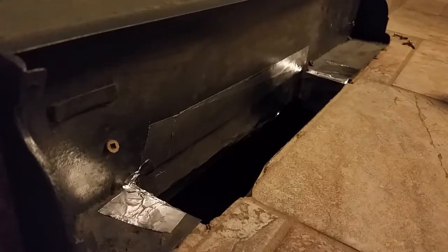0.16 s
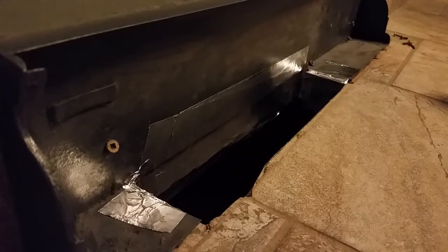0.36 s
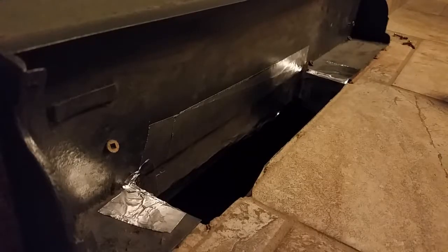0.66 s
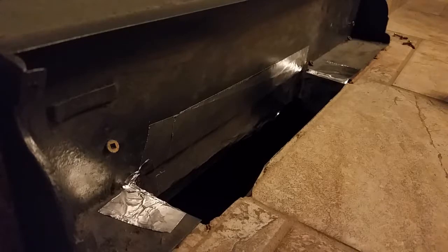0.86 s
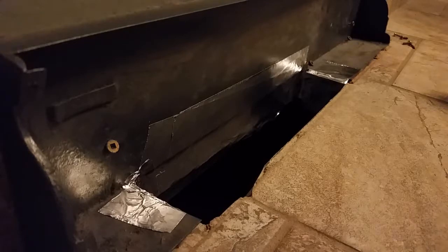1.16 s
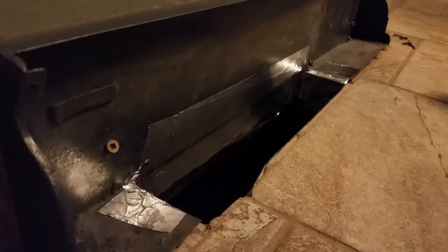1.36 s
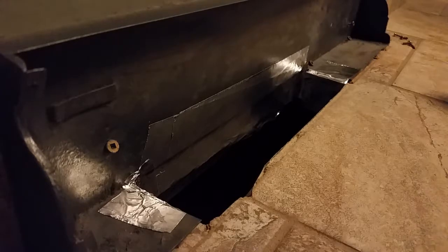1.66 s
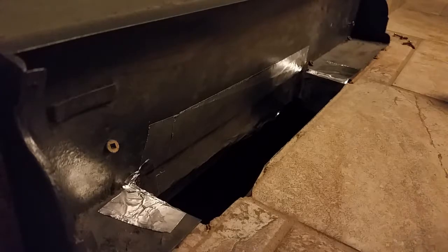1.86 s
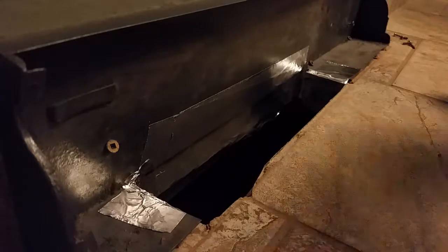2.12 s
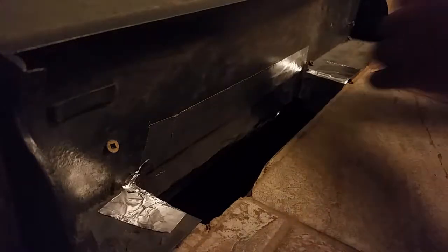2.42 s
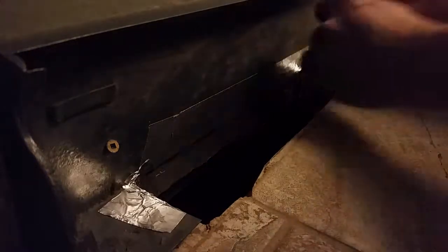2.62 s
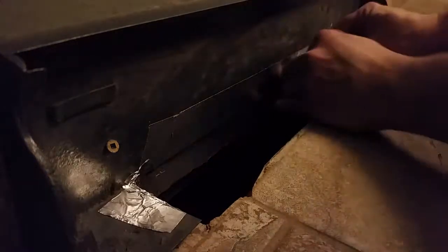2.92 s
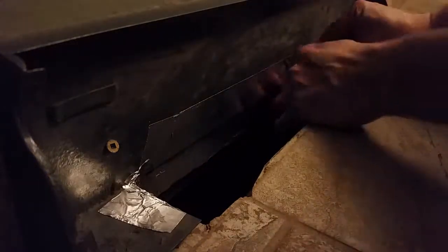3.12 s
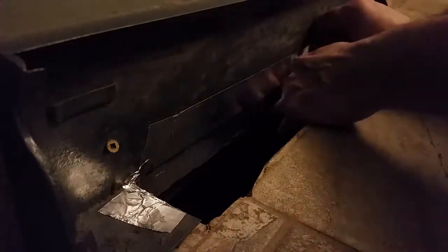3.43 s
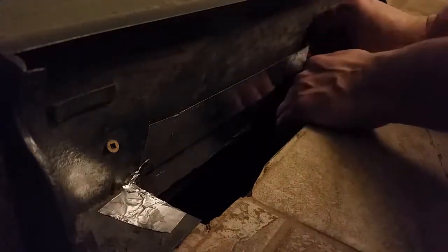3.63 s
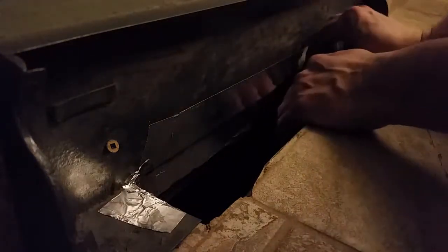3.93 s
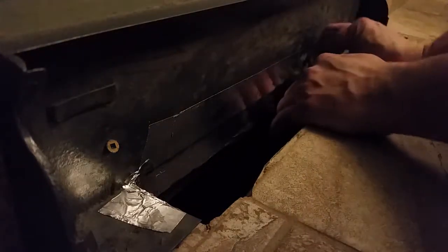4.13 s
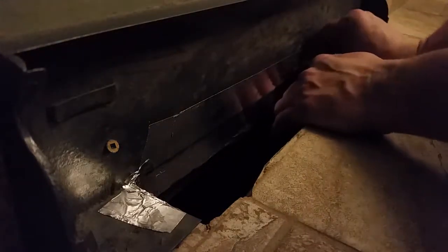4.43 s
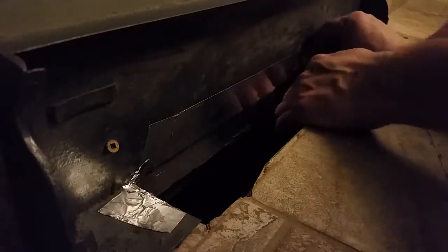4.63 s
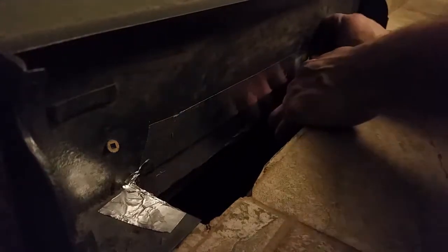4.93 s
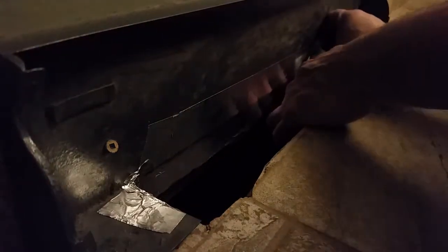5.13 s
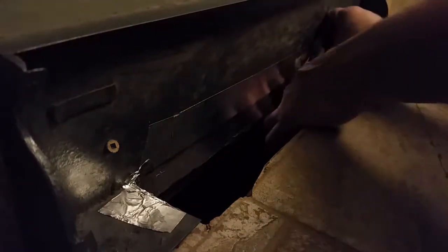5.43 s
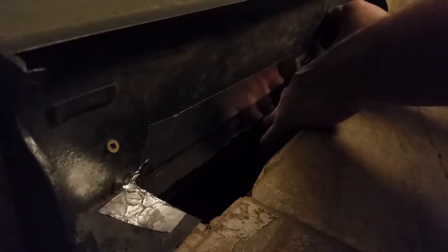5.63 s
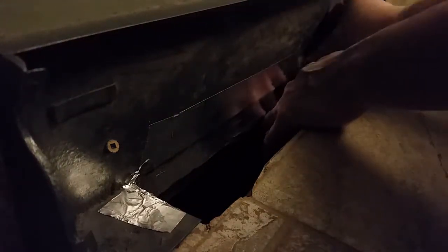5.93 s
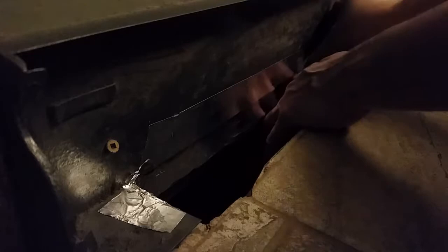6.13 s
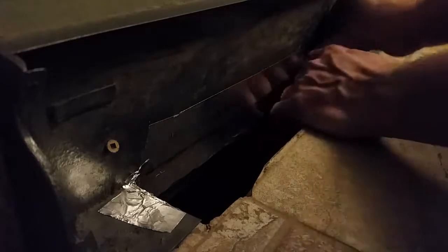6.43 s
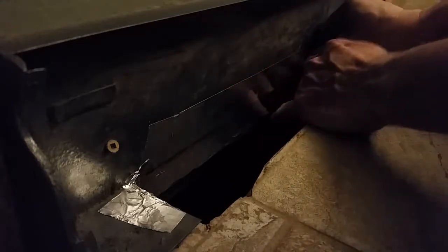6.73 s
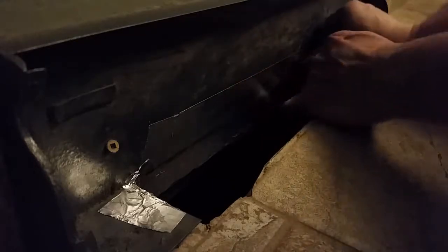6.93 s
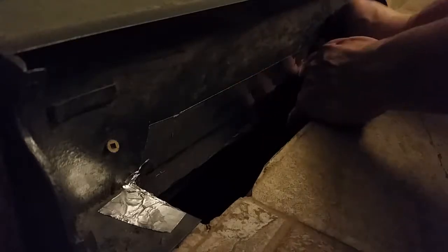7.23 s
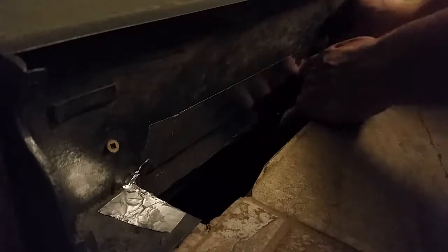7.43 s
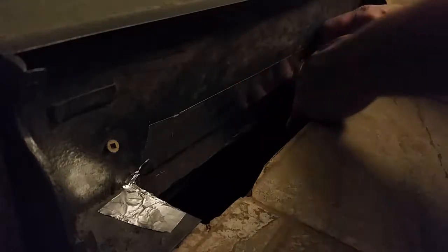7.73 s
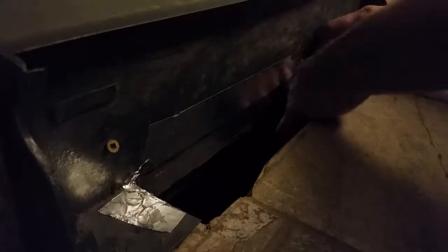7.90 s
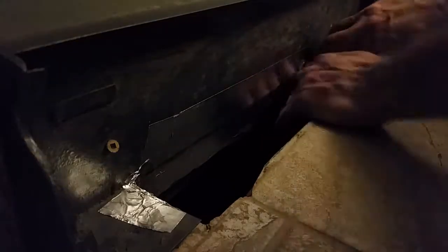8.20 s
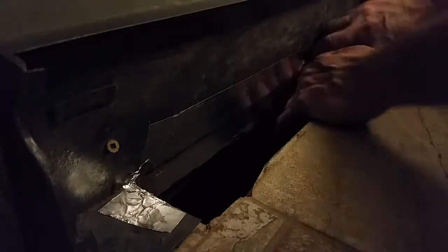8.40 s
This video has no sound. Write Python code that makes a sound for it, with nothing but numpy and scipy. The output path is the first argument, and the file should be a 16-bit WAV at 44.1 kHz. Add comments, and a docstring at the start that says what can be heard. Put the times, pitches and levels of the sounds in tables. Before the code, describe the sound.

Fingers rub crackling foil tape down in uneven strokes, with light knocks and rasps from a thin panel in a quiet room.

```python
"""Aluminium foil tape hisses, crinkles and snaps close up, as hands press it onto a thin panel.
Sliding fingers make the hiss, wrinkles give way in dry ticks, and buckling creases crack.
Behind the foil the panel rasps and scrapes with friction, knocks when bumped, rumbles and flexes.
It lies beside an opening in the tiled floor of a small room filled with a faint low hum."""
import sys
import numpy as np
from scipy import signal
from scipy.fft import rfft, irfft
from scipy.io import wavfile

SR = 44100
rng = np.random.default_rng(int(sys.argv[2]) if len(sys.argv) > 2 else 0)


def to_wav(sig):
    """Store sig (one row per channel, or 1-D mono) as 16-bit WAV at the path in sys.argv[1].

    Samples outside -1..1 are clipped; the rate is SR.
    """
    pcm = np.clip(np.atleast_2d(sig), -1, 1) * 32767
    pcm = np.round(pcm).astype(np.int16)
    wavfile.write(sys.argv[1], SR, pcm.T)  # frames by channels


N = 377496
TIME = np.arange(N) / SR


def from_db(db):
    """Decibels to gain."""
    return 10 ** (np.asarray(db) / 20)


def together(*levels_db):
    """Level in dB of several layers whose powers add."""
    return 10 * np.log10(sum(from_db(db) ** 2 for db in levels_db))


def unit_energy(x):
    """Scale each channel so that its squares sum to one."""
    return x / np.sqrt(np.sum(x ** 2, axis=-1, keepdims=True) + 1e-20)


def automation(rows):
    """Join timed breakpoints by straight lines, one curve per value column."""
    times, *columns = np.transpose(rows)
    return [np.interp(TIME, times, column) for column in columns]


def drift(per_s):
    """Random modulation with a spread near one."""
    return np.interp(TIME * per_s, np.arange(N // 8), rng.standard_normal(N // 8))


def add(track, s, sound):
    """Mix a sound into a track at s seconds."""
    start = int(np.clip(s * SR, 0, N - 1))
    track[..., start:start + sound.shape[-1]] += sound[..., :N - start]


def convolve(x, response):
    """Pass a sound through an impulse response."""
    return signal.oaconvolve(np.atleast_2d(x), np.atleast_2d(response), axes=-1)[:, :N]


def response_of(eq, size=4096):
    """Minimum-phase impulse response of an EQ curve."""
    hz, level_db = np.transpose(eq)
    bins_hz = np.maximum(np.arange(size // 2 + 1) * SR / size, 1)
    gains = from_db(np.interp(np.log(bins_hz), np.log(hz), level_db))
    cepstrum = irfft(np.log(gains))
    fold = 1 + np.sign(size // 2 - np.arange(size))
    fold[0] = 1
    return irfft(np.exp(rfft(cepstrum * fold)))


def coloured(x, eq):
    """Apply an EQ curve, scaled so that white noise keeps its power."""
    return convolve(x, unit_energy(response_of(eq)))


def band(x, kind, hz, order):
    """Low-pass or high-pass filter."""
    return signal.sosfilt(signal.butter(order, hz, kind, fs=SR, output="sos"), x)


def resonate(x, hz, width_hz):
    """Two-pole resonance with gain one at its peak."""
    r = np.exp(-np.pi * width_hz / SR)
    poles = [1, -2 * r * np.cos(2 * np.pi * hz / SR), r * r]
    return signal.lfilter(np.array([1, 0, -1]) * (1 - r * r) / 2, poles, x + 1e-18)


def stereo_noise(length, likeness):
    """White noise, from wide (likeness 0) to mono (1): uneven radiation reaches each side differently."""
    centre = np.sqrt(likeness) * rng.standard_normal(length)
    return centre + np.sqrt(1 - likeness) * rng.standard_normal((2, length))


def burst(decay_s, spread_db, likeness):
    """A quickly dying run of uneven micro-slips, of unit energy."""
    t = TIME[:SR // 8]
    sizes = from_db(spread_db * rng.standard_normal(len(t)))
    return unit_energy(stereo_noise(len(t), likeness) * sizes * np.exp(-t / decay_s))


def grains(per_s, spread_db, likeness):
    """Random slips with power one; spread_db makes a few stand out."""
    sizes = from_db(spread_db * np.minimum(rng.exponential(1, N), 4))
    slipping = rng.random(N) < per_s / SR
    return unit_energy(sizes * slipping * stereo_noise(N, likeness)) * np.sqrt(N)


def shifting(x):
    """The sliding hand frees and damps resonances, so the colour keeps changing; power one."""
    rings = sum((-1) ** k * resonate(x, hz, 0.2 * hz) * from_db(4 * drift(per_s=35))
                for k, hz in enumerate(np.geomspace(250, 15000, 20)))
    return unit_energy(rings) * np.sqrt(N)


# EQ of the still room: f/Hz, relative level/dB
ROOM_AIR_EQ = [(60, 12), (110, -5.5), (250, -14), (1000, -70), (4000, -12.5), (6000, -69)]


def room_tone(hum_hz=99.6):
    """A bed of low air noise and a hum that wavers a little in level."""
    air = coloured(stereo_noise(N, likeness=0.84), ROOM_AIR_EQ)
    hum = np.sqrt(2) * np.sin(2 * np.pi * hum_hz * TIME)
    return from_db(-68.5) * air + from_db(-64 + 2 * drift(per_s=14)) * hum


def in_room(x, wet_db, t60_s=0.39):
    """Direct sound plus a short room tail whose treble dies first."""
    t = TIME[:SR // 2]
    wash = rng.standard_normal((2, len(t)))
    wash += band(wash[0] - wash, "low", 500, order=1)   # long waves reach both sides alike
    dull = band(wash, "low", 6000, order=1)
    bright = (wash - dull) * np.exp(-t / 0.014)
    tail = unit_energy((dull + bright) * from_db(-60 * t / t60_s))
    return convolve(x, unit_energy((t == 0) + from_db(wet_db) * tail))


# Rumble from the weight of the resting hands: t/s, level/dB
LEANING = [(0, -70.5), (1.3, -63.5), (3.05, -50.5), (3.85, -62.5), (4.25, -57.5), (7.8, -60.5), (8.2, -50)]
# EQ of the panel's low end: f/Hz, relative level/dB
RUMBLE_EQ = [(35, -37), (70, -0.5), (100, 2.5), (170, -0.5), (260, -4), (450, -9.5), (1500, -37.5)]


def panel_rumble(rasp_db):
    """The whole sheet rumbles under the hands, and each stroke rocks it too."""
    rumble_db = together(*automation(LEANING), rasp_db - 7)
    envelope = from_db(rumble_db + 3.2 * drift(per_s=38))
    return coloured(envelope * grains(per_s=700, spread_db=0, likeness=0.8), RUMBLE_EQ)


OVERTONE = 1.63   # second resonance of a flexing or scraped panel, as a multiple of the first
# Judders of the panel: t/s, rise/s, f/Hz, level/dB
FLEXES = [(1.308, 0.015, 93.4, -38.5), (6.859, 0.0043, 370, -37.5)]


def panel_flexing():
    """The panel flexes under a finger: a short swell at a wavering pitch, with a weaker overtone."""
    out = np.zeros(N)
    for s, rise_s, hz, level_db in FLEXES:
        age = TIME[:SR // 3] / rise_s
        swell = (age * np.exp(1 - age)) ** 2
        wavering_hz = hz * (1 + 0.02 * drift(per_s=430)[:len(swell)])
        phase = 2 * np.pi * np.cumsum(wavering_hz) / SR
        tone = np.sin(phase) + 0.22 * np.sin(OVERTONE * phase)
        add(out, s, from_db(level_db) * np.sqrt(2) * swell * tone)
    return out


# EQ of the rubbed panel: f/Hz, relative level/dB
RASP_EQ = [(130, -11.5), (380, 0.5), (950, 0), (1450, 5), (2500, -3), (9000, -13.5)]


def panel_rasp(rasp_db):
    """Friction shakes the panel unevenly: a grainy midrange under the foil."""
    envelope = from_db(rasp_db + 2.52 * drift(per_s=81))
    friction = shifting(grains(per_s=2500, spread_db=2, likeness=0.4))
    return coloured(envelope * friction, RASP_EQ)


# Hollow fingertip drags: peak t/s, half length/s, f/Hz, level/dB
SCRAPES = [(1.3, 0.07, 350, -57), (1.566, 0.038, 330, -54), (2.364, 0.082, 1350, -51),
           (4.856, 0.019, 780, -36.5), (5.9, 0.5, 1550, -67), (6.529, 0.031, 696, -40.5),
           (7.42, 0.013, 1620, -39)]


def panel_scrapes(overtone_db=-11):
    """Stick-slip noise swells and fades in one narrow resonance and its overtone."""
    out = np.zeros((2, N))
    slips = stereo_noise(N, likeness=0.87)
    for s, half_length_s, hz, level_db in SCRAPES:
        width_hz = 0.18 * hz
        ringing = resonate(slips, hz, width_hz)
        ringing += from_db(overtone_db) * resonate(slips, OVERTONE * hz, width_hz)
        swell = np.exp(-((TIME - s) / half_length_s) ** 2 / 2)
        out += from_db(level_db) * swell * ringing / ringing.std()
    return out


# Bending modes of the panel: f/Hz
PANEL_MODES_HZ = [99, 130, 166, 194, 260, 430, 497, 653]
# Hands bumping the panel: t/s, relative thud level/dB, relative clack level/dB, clack f/Hz
KNOCKS = [(1.485, -50, -55, 404), (1.529, -47, -40, 2920), (1.83, -47, -56, 500), (1.911, -63, -45, 490),
          (2.86, -30, -34, 600), (2.989, -69, -38, 2280), (3.034, -41, -40, 1590), (3.154, -39, -32, 1760),
          (3.407, -43.5, -42.5, 587), (4.228, -41, -44, 1670), (4.455, -55, -42.5, 2500),
          (4.771, -93, -51, 1000), (4.805, -63, -39.5, 800), (5.07, -70, -33.5, 1440),
          (5.111, -42, -30.5, 2150), (6.505, -70, -36.5, 980), (7.84, -33, -38, 1340),
          (8.406, -61, -41, 1260)]


def panel_thuds():
    """The body of each knock: the bump sets the bending modes ringing, and the high ones die sooner."""
    out = np.zeros(N)
    t, hz = TIME[:SR // 3], np.array(PANEL_MODES_HZ)[:, None]
    height = hz / 380
    # the lowest modes radiate weakly; a soft hand hardly stirs the highest
    weights = 2 * height / (1 + height ** 3)
    modes = weights * np.sin(2 * np.pi * hz * t) * np.exp(-t * np.sqrt(hz) / 0.28)
    for s, thud_db, *_ in KNOCKS:
        strengths = rng.choice([-1, 1], len(hz)) * from_db(2 * rng.standard_normal(len(hz)))
        add(out, s, from_db(thud_db) * (strengths @ modes))
    return out


def panel_clacks(gain_db=31.5):
    """The attack of each knock: a dry tap, pitched by the spot that is struck."""
    out = np.zeros((2, N))
    for s, _, clack_db, hz in KNOCKS:
        tap = resonate(burst(decay_s=0.0058, spread_db=7.5, likeness=0.52), hz, width_hz=0.9 * hz)
        add(out, s, from_db(clack_db + gain_db) * unit_energy(tap))
    return out


# Faint hiss of the hands' contact between strokes: t/s, level/dB
RESTING = [(0, -99), (.95, -75.5), (1.5, -42), (2.0, -49), (2.8, -38), (3.28, -50), (3.78, -62.5),
           (5.35, -57), (6.05, -62.5), (8.55, -51)]
# Finger strokes: t/s, length/s, foil hiss level/dB, panel rasp level/dB
STROKES = [(0.449, 0.089, -58, -75.5), (1.054, 0.13, -52.5, -85), (1.475, 0.088, -32.5, -71),
           (1.753, 0.026, -36.5, -64), (1.957, 0.57, -44.5, -52.5), (2.443, 0.031, -28.5, -54),
           (2.546, 0.1, -31, -56), (2.62, 0.098, -35, -53), (2.814, 0.052, -32, -44.5),
           (2.975, 0.035, -25.5, -49.5), (3.074, 0.1, -34, -46.5), (3.364, 0.056, -37, -56),
           (3.446, 0.036, -30, -43.5), (3.801, 0.13, -54.5, -57), (4.169, 0.15, -41.5, -45.5),
           (4.365, 0.044, -36.5, -44.5), (4.782, 0.091, -37.5, -55), (4.942, 0.11, -44.5, -48),
           (5.038, 0.083, -32, -42), (6.179, 0.075, -47.5, -57.5), (6.321, 0.18, -39.5, -51.5),
           (6.484, 0.066, -43.5, -46), (6.585, 0.1, -40, -47), (6.797, 0.23, -47, -52.5),
           (7.249, 0.064, -27.5, -41), (7.398, 0.011, -36, -42.5), (7.552, 0.0082, -40.5, -45.5),
           (7.597, 0.093, -39, -46), (7.699, 0.24, -47, -54.5), (7.998, 0.019, -45.5, -42.5),
           (8.1, 0.079, -42.5, -49.5), (8.22, 0.16, -44, -55), (8.398, 0.018, -32, -39.5),
           (8.478, 0.009, -38.5, -39)]


def finger_pressure(press_share=0.5, lift_db_per_s=267):
    """Hiss and rasp envelopes in dB: over the resting contact, each stroke presses, slides and lifts."""
    rest_hiss_db, = automation(RESTING)
    rest_rasp_db = -67 + 0.51 * (rest_hiss_db - rest_hiss_db.mean())
    power = from_db([rest_hiss_db, rest_rasp_db]) ** 2
    t = TIME[:SR]
    for s, length_s, hiss_db, rasp_db in STROKES:
        press = np.minimum(t / (press_share * length_s), 1)
        lift = from_db(-lift_db_per_s * np.maximum(t - length_s, 0))
        add(power, s, (from_db([[hiss_db], [rasp_db]]) * press * lift) ** 2)
    return 10 * np.log10(power)


def foil_rubbing(hiss_db, crinkle_db, ticks_per_s=120, tick_decay_s=0.0007):
    """Skin hisses over the foil; wrinkles give way in ticks that stand out most under a light touch."""
    giving_way = rng.random(N) < ticks_per_s / SR
    wrinkles = giving_way * from_db(6 * np.minimum(rng.exponential(1, N), 3))
    decays = signal.lfilter([1], [1, -np.exp(-1 / (tick_decay_s * SR))], wrinkles + 1e-18)
    crackle = stereo_noise(N, likeness=0) * decays
    ticks = unit_energy(band(crackle, "high", 5500, order=2)) * np.sqrt(N)
    hiss = shifting(grains(per_s=9000, spread_db=3.5, likeness=0.04))
    light_touch_db = 0.24 * (hiss_db.mean() - hiss_db)
    envelope = from_db(hiss_db + 2.6 * drift(per_s=130))
    return envelope * (hiss + from_db(crinkle_db + light_touch_db) * ticks)


# The loudest creases snapping through: t/s, relative level/dB, facet f/Hz
SNAPS = [(1.0292, -38, 12800), (1.086, -38, 10600), (1.423, -23, 13600), (1.4365, -26, 11500),
         (1.4786, -32.5, 10000), (1.5234, -21.5, 11500), (1.5342, -23.5, 11100), (1.7987, -23, 10700),
         (1.911, -25, 10400), (2.0081, -30.5, 9900), (2.457, -18.5, 5570), (2.6352, -26.5, 11500),
         (2.693, -27.5, 9500), (2.7174, -20.5, 9700), (2.8432, -14, 8000), (2.9905, -18.5, 9200),
         (3.154, -16.5, 7740), (3.2024, -28.5, 3100), (3.407, -16.5, 11400), (3.4612, -19, 11000),
         (4.0312, -38, 11900), (4.237, -22.5, 8200), (4.284, -32, 6460), (4.313, -26, 12800),
         (4.344, -22.5, 4600), (4.384, -22, 10500), (4.6843, -41, 6900), (4.7241, -30, 12700),
         (4.799, -25, 13000), (5.0712, -16.5, 11100), (5.086, -23, 7000), (5.11, -20.5, 6050),
         (5.3955, -34.5, 10500), (5.657, -34.5, 6800), (5.881, -33, 7800), (6.111, -29, 11700),
         (6.239, -32, 7060), (6.783, -43, 11500), (6.9204, -26, 6950), (7.4697, -27, 4800),
         (8.241, -31.5, 11500)]


def foil_snaps(rise_s=0.0006, gain_db=21.5):
    """A crease buckles in milliseconds, a loud one more slowly; its damped facet colours the crack."""
    out = np.zeros((2, N))
    for s, crack_db, facet_hz in SNAPS:
        crack = burst(decay_s=0.0056 * 2 ** (crack_db / 20), spread_db=3, likeness=0.31)
        crack *= np.minimum(TIME[:crack.shape[1]] / rise_s, 1)
        facet = resonate(crack, facet_hz, width_hz=0.6 * facet_hz)
        add(out, s, from_db(crack_db + gain_db) * unit_energy(facet))
    return out


# EQ of the foil: f/Hz, relative level/dB
FOIL_EQ = [(500, -18.5), (2000, -4.5), (3500, 4), (6800, 3), (16000, -2.5)]
# Tape under the fingers: t/s, share hanging free/0-1, crinkle level/dB against the hiss at average touch
SLACK = [(1.2, 0.73, 2.5), (2.3, 0.79, -45), (2.6, 0.71, 0.5), (4.8, 0.54, -18), (5.6, 0.65, 5),
         (6.25, 0.66, -1.5), (7.2, 0.75, -16)]


def foil_tape(hiss_db):
    """Free tape sounds thin and bright and lies to the right; stuck down it sounds fuller."""
    slack, crinkle_db = automation(SLACK)
    full = coloured(foil_rubbing(hiss_db, crinkle_db) + foil_snaps(), FOIL_EQ)
    thin = band(full, "high", 10000, order=2)
    free = slack ** 2
    blend = np.sqrt(np.maximum(1 - 1.3 * free, 0)) * full + 2.68 * free * thin
    pan = from_db(4.32 * slack * [[-1], [1]])
    return blend * pan


def scene():
    """Foil and panel play into the small room on three reverb sends, over the room tone."""
    hiss_db, rasp_db = finger_pressure()
    crisp = in_room(foil_tape(hiss_db) + panel_clacks(), wet_db=-9)
    rasp = in_room(panel_rasp(rasp_db) + panel_scrapes(), wet_db=-8)
    boom = in_room(panel_rumble(rasp_db) + panel_thuds() + panel_flexing(), wet_db=-7)
    return crisp + rasp + boom + room_tone()


# EQ of the two microphone ports, each with its own treble resonance: f/Hz, left level/dB, right level/dB
PORT_EQ = [(285, -3.5, -2), (1550, -2.5, -4.5), (2650, -2, -8), (5500, 2.5, -15.5), (7740, 6, -12),
           (8670, -9, -7), (9880, -9, 0), (13400, -8, -7)]


def record(dry, cutoff_hz=15800):
    """Each microphone port colours its channel; a steep low-pass cuts the top."""
    ports = np.array(PORT_EQ)
    heard = np.vstack([convolve(dry[side], response_of(ports[:, [0, side + 1]])) for side in range(2)])
    return signal.sosfilt(signal.ellip(10, .2, 70, cutoff_hz, fs=SR, output="sos"), heard)


dry = scene()
out = record(dry)
to_wav(out)
```